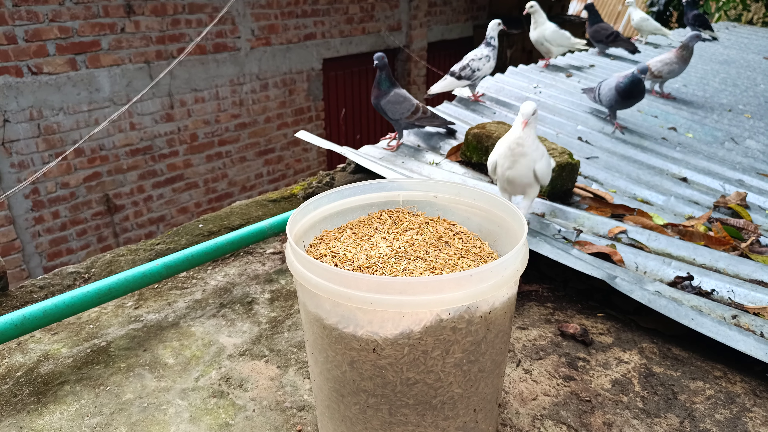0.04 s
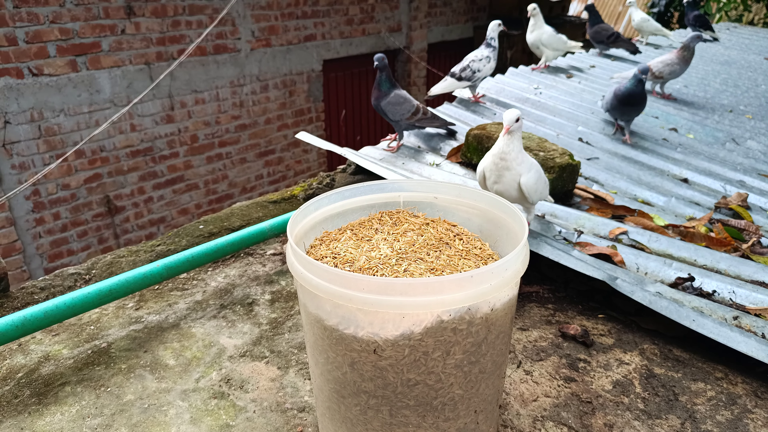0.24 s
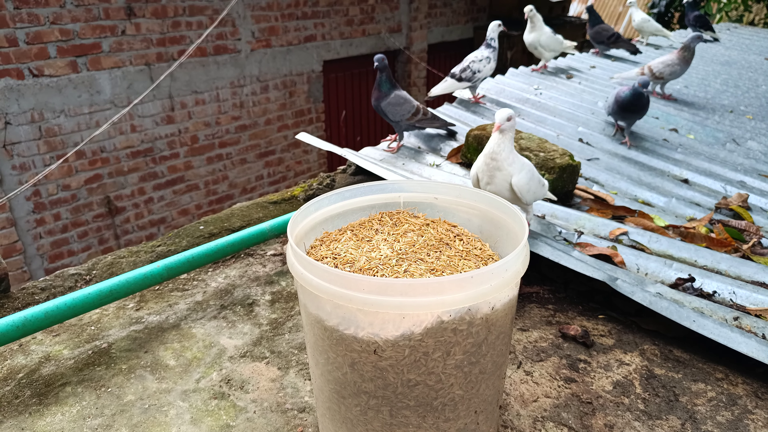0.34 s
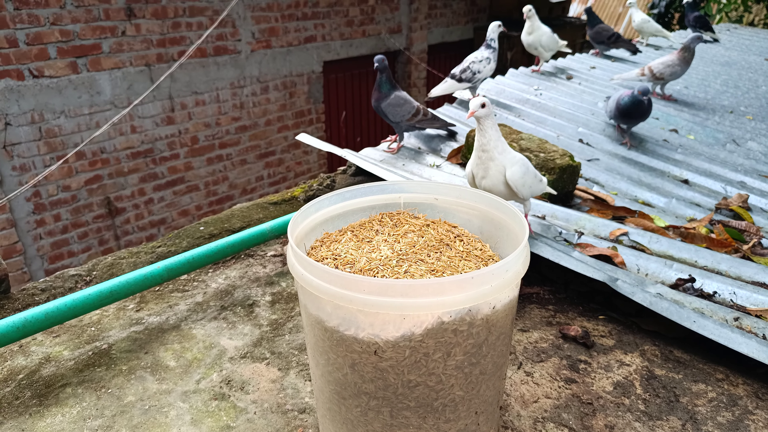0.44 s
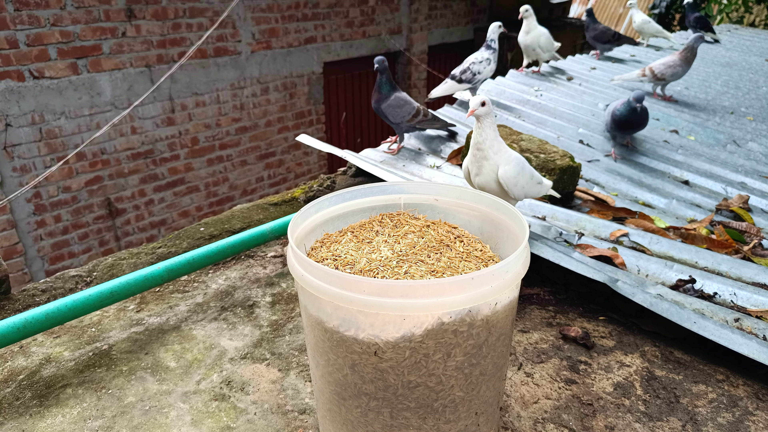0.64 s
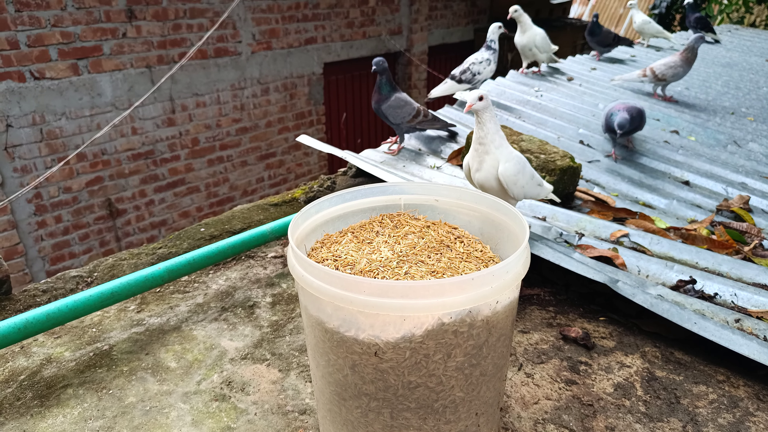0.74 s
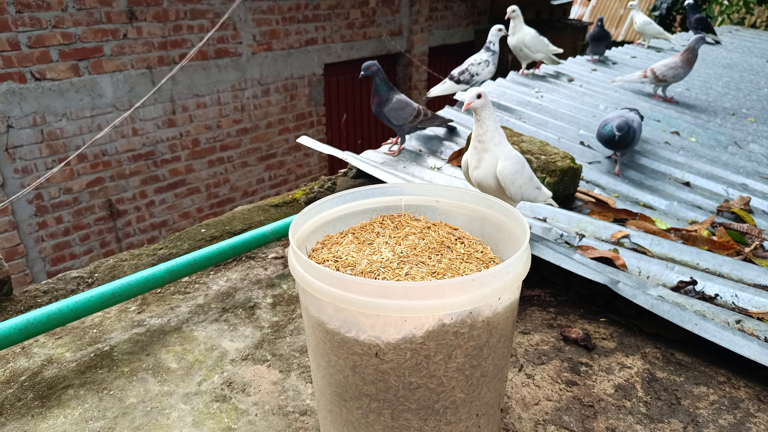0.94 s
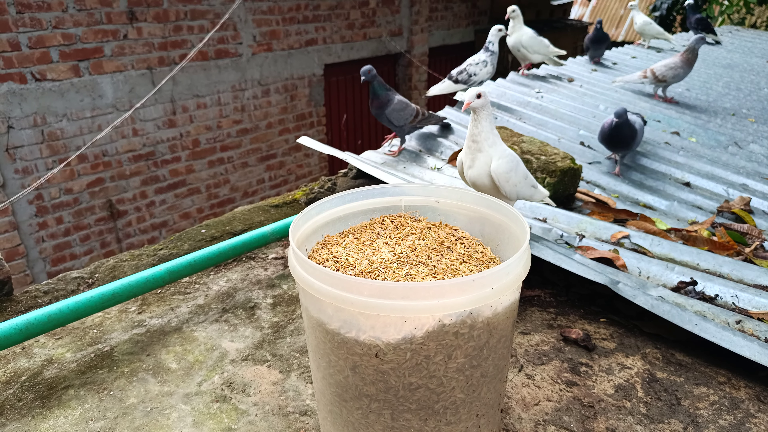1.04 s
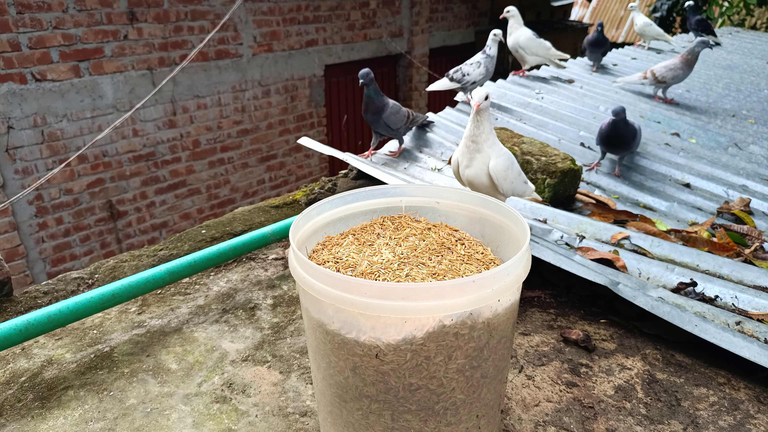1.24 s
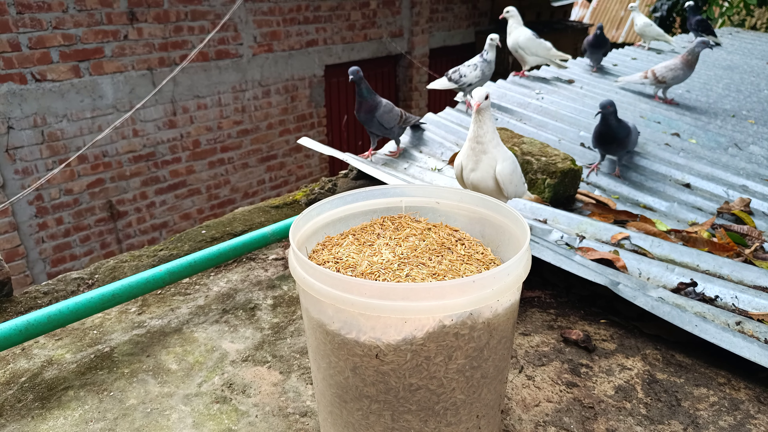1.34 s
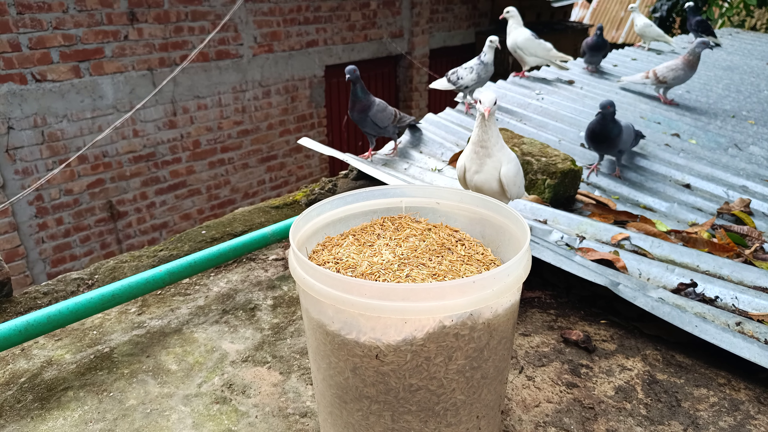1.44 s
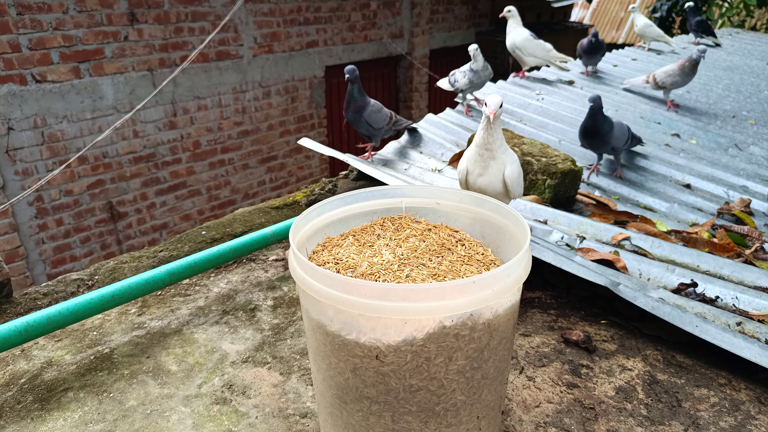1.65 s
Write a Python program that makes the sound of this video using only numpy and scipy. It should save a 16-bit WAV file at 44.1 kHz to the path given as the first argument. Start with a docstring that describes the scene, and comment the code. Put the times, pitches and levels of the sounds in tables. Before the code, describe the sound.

Pigeon feet tap lightly on a metal roof while a small bird chirps far off.

```python
"""Over a quiet outdoor hum a small bird whistles far off, and pigeons patter onto a corrugated metal roof.
Each footfall sends a bending wave through the sheet, treble first and bass last, and the sheet rings
briefly. Claws scuff, the heaviest step lands at 0.3 s, then a lull holds faint ticks and dull knocks.
The feet return at 1 s and 1.3 s; two ticks and a long, soft scuff end the scene."""
import sys
import numpy as np
from scipy import signal
from scipy.fft import rfft, irfft
from scipy.io import wavfile
from scipy.ndimage import uniform_filter1d

SR = 44100
rng = np.random.default_rng(int(sys.argv[2]) if len(sys.argv) > 2 else 0)


def bounce(signal):
    """Save signal as a 16-bit WAV file at the path given by the first command-line argument."""
    frames = np.transpose(np.atleast_2d(signal))
    limited = np.clip(frames, -1, 1)
    pcm = np.round(limited * 32767).astype(np.int16)
    wavfile.write(sys.argv[1], SR, pcm)


N = 74970

# Tone of the outdoor bed. Each row: frequency in Hz, relative level in dB.
AIR_TONE = [(25, -25), (42, -32), (60, -25.5), (90, -5), (130, -4), (210, -8.5), (310, -7), (420, -15),
            (700, -13), (1500, -16), (2500, -17.5), (4000, -19), (6000, -26.5), (7300, -31), (8500, -29.5),
            (11500, -39), (15500, -38.5)]
# Stereo image of the bed. Each row: frequency in Hz, left-right likeness (1 is mono).
AIR_LIKENESS = [(30, 0.97), (80, 1), (300, 0.86), (700, 1), (1500, 0.083), (4000, 0.022), (16000, 0.033)]
# Distant drone. Each row: pitch in Hz, level in dB.
DRONE = [(108, -61.5), (170, -62)]
# The far bird's whistles and, in the last row, a short, high-pitched tick.
# Each row: start and length in seconds, first and last pitch in Hz, level in dB.
GLIDES = [(-.01, 0.057, 5470, 4950, -58), (.155, .10, 3524, 5640, -53.5), (0.384, .10, 3820, 5650, -55.5),
          (0.527, 0.0273, 5300, 4360, -48), (1.384, 0.0134, 4480, 4660, -49.5)]
# Dull knocks. Each row: start in seconds, level in dB, pitch and width in Hz, decay in seconds.
KNOCKS = [(.668, -36, 541, 50, 0.0084), (.680, -45.5, 285.3, 50, 0.038), (.920, -48.5, 1700, 160, 0.017),
          (.112, -35.5, 782, 30.3, 0.017), (1.04, -47, 1026, 70, 0.028), (1.324, -45.5, 219.4, 40, 0.035)]
# Sliding claws. Each row: start and length in seconds, level and treble in dB.
SCUFFS = [(0.211, 0.055, -42, 4.5), (0.237, 0.07, -44.5, -6.5), (0.535, 0.029, -46, 0),
          (.915, 0.081, -51, -25), (1.197, .05, -59, 6), (1.454, 0.18, -52.5, 0)]
# Tone of a scuff. Each row: frequency in Hz, relative level in dB.
SCUFF_TONE = [(200, -29), (900, -10.5), (2500, 2), (5000, -3.5), (6500, -4), (9000, -5), (12000, -7),
              (16000, -1.5)]
# Tone of the metal sheet. Each row: frequency in Hz, gain in dB.
SHEET_TONE = [(60, -39), (200, -14.5), (320, 7), (390, -0.5), (460, 4.5), (560, 5.5), (680, 4), (860, 6),
              (945, -8), (1130, 8.5), (1420, -4), (1700, 6.5), (1900, -2), (2400, 1), (4400, -1),
              (5800, -7), (8500, -10.5), (11500, -13.5), (15500, -11.5)]
# Its clearest modes. Each row: pitch in Hz, relative level in dB, seconds to fade by 60 dB.
SHEET_MODES = [(324.7, -7, .19), (471.4, -0.5, 0.17), (527.4, 1, 0.16), (568, -5, 0.27), (632, 5, 0.16),
               (709, 0, 0.21), (857, 1, .17), (1133, -3.5, 0.13), (1131, -8, 0.13), (1122, -12.5, 0.22),
               (1800, -10, 0.18), (2215, 7, 0.15), (2350, 5.5, 0.075), (3330, -20, 0.16), (4080, 11, 0.13)]
# Its dense ring. Each row: band centre in Hz, seconds to fade by 60 dB.
RING_T60 = [(200, .18), (600, 0.2), (1500, 0.18), (4000, 0.18), (8000, 0.17), (16000, 0.077)]
# Stereo image of the roof. Each row: frequency in Hz, left-right likeness.
ROOF_LIKENESS = [(60, 0.57), (300, 1), (650, 0.5), (1400, 0.64), (3000, 0.097), (16000, 0.041)]
# Light claw ticks. Each row: start in seconds, relative level and treble in dB.
TICKS = [(0.156, -24.5, 2), (0.308, -21.5, -4), (0.633, -31, 4), (1.191, -31, 12.5), (1.427, -21.5, 8)]
# Full steps. Each row: start in seconds, relative level, bass and treble in dB,
# the bending wave's travel time at 1 kHz and the contact length in seconds.
STEPS = [(0.0985, -8.5, -38, 5.5, 0.0069, 0.0024), (.103, -19, -13, 3, 0.0036, 0.0074),
         (0.111, -17, 4, 3.5, 0.0052, 0.011), (0.122, -11, -12, 2.5, 0.00398, 0.0085),
         (0.316, -2, -3, 2, .013, .010), (0.321, 3, -4, -30, 0.0048, 0.01),
         (0.992, -24, -18, 9, 0.0099, 0.0064), (1.006, -14.5, 4, 8, .006, 0.0082),
         (1.301, -12, -14, 2.5, .012, 0.0086), (1.3086, -16.5, 9.5, -8, 0.00295, 0.01),
         (1.324, -12.5, -14.5, -10, 0.0053, 0.0094), (1.344, -17.5, 9.5, 8.5, 0.0051, .013)]
# Colour of the microphone ports. Each row: frequency in Hz, left minus right in dB.
PORT_BALANCE = [(60, -2.5), (140, 2), (250, -1.5), (600, 0), (1700, -0.5), (2700, -4.5), (4300, -9.5),
                (6100, -2), (7300, 4.5), (8500, 18), (10500, 4.5), (12000, 1), (14000, -4.5), (16000, -2)]

AIR_DB, AIR_PATCH_DB = -49.5, 1.35
AIR_LAG_S = 0.000306  # the bed comes from the right and reaches the left microphone later
GLIDE_BEND, GLIDE_WAVER, GLIDE_FLUTTER_DB, ECHO_T60 = 1.3, 0.03, 4, 0.28
SCUFF_GRAIN_DB, SCUFF_RISE_SHARE = 3, 0.11
STEP_DB, RING_DB, MODES_DB, YARD_DB, YARD_T60 = -20, -4, -26.5, -32, 0.87
FULL_CONTACT_S = 0.0067  # shorter contacts leave less ringing in the sheet
THUD_HZ, THUD_S, THUD_DB = 537, 0.0023, -4.5  # the panel gives way underfoot with a hollow thud
PUSH_DB, PUSH_S = 5.5, 0.00005  # the sharp push of the foot that heads each blow
FASTEST_HZ = 4480  # above this all waves arrive together
BASS_HZ, TREBLE_HZ, TOP_HZ = 940, 5600, 15900


def amp(db):
    """Decibels to gain."""
    return 10 ** (np.asarray(db) / 20)


def unit(x):
    """Scales to rms 1."""
    return x / np.sqrt(np.mean(x ** 2) + 1e-20)


def read(points, hz):
    """Reads a curve on a log-frequency axis."""
    f, value = np.transpose(points)
    return np.interp(np.log(hz + 1), np.log(f + 1), value)


def add(mix, s, sound):
    """Mixes a sound in at s seconds."""
    at = round(s * SR)
    sound = sound[..., max(-at, 0):]
    part = mix[:, max(at, 0):][:, :sound.shape[-1]]
    part += sound[..., :part.shape[1]]


def bins(size):
    """Frequencies of a spectrum in Hz."""
    return np.fft.rfftfreq(size, 1 / SR)


def noise_pair(size, likeness):
    """Stereo white noise whose width follows a likeness curve."""
    a, b = rfft(rng.standard_normal((2, size)))
    alike = np.clip(read(likeness, bins(size)), -1, 1)
    mid, side = a * np.sqrt((1 + alike) / 2), b * np.sqrt((1 - alike) / 2)
    return irfft(np.array([mid + side, mid - side]), size)


def wander(size, rate_hz):
    """Smooth random motion of about rms 1."""
    spectrum = rfft(rng.standard_normal(N)) / (1 + (bins(N) / rate_hz) ** 4)
    return unit(irfft(spectrum, N))[:size]


def shelves(hz, bass_db, treble_db):
    """Bass and treble shelf EQ for one contact, in dB."""
    return bass_db / (1 + (hz / BASS_HZ) ** 2) + treble_db / (1 + (TREBLE_HZ / (hz + 1)) ** 4)


def outdoors():
    """The bed: a quiet, gently patchy wash of air with a wavering low drone."""
    lag = np.exp(-2j * np.pi * np.outer([AIR_LAG_S, 0], bins(N)))
    wash = irfft(rfft(noise_pair(N, AIR_LIKENESS)) * lag * amp(read(AIR_TONE, bins(N))), N)
    frames = signal.stft(wash, nperseg=512)[2]
    patches = uniform_filter1d(rng.standard_normal(frames.shape[1:]), size=9, axis=0)  # across frequency
    patches = unit(uniform_filter1d(patches, size=12, axis=1))  # across time
    wash = signal.istft(frames * amp(AIR_PATCH_DB * patches), nperseg=512)[1][:, :N]
    out = unit(wash) * amp(AIR_DB)
    for hz, db in DRONE:
        pitch = hz + 4 * wander(N, rate_hz=11.8)
        out += amp(db) * np.sin(2 * np.pi * np.cumsum(pitch) / SR)
    return out


def far_bird_and_tick():
    """Thin gliding whistles and one short, high-pitched tick, blurred by echoes from the walls."""
    out, t = np.zeros((2, N)), np.arange(SR // 2) / SR
    for s, length, first_hz, last_hz, db in GLIDES:
        progress = np.arange(0, 1, 1 / (length * SR))
        glide = last_hz + (first_hz - last_hz) * (1 - progress) ** GLIDE_BEND
        pitch = glide * (1 + GLIDE_WAVER * wander(len(progress), rate_hz=480))
        level = amp(db + GLIDE_FLUTTER_DB * wander(len(progress), rate_hz=70))
        arch = np.sqrt(abs(np.sin(np.pi * progress)))
        add(out, s, level * arch * np.sin(2 * np.pi * np.cumsum(pitch) / SR))
    echo = rng.standard_normal((2, len(t))) * amp(-60 * t / ECHO_T60)
    return out + signal.fftconvolve(out, echo / np.linalg.norm(echo[0]), axes=1)[:, :N]


def knocks(rise_s=0.0031):
    """Birds farther up the roof: each soft blow wakes one narrow group of modes."""
    out, t = np.zeros((2, N)), np.arange(SR // 4) / SR
    for s, db, hz, width, decay_s in KNOCKS:
        pitch = hz + width / 2 * wander(len(t), rate_hz=width)
        envelope = np.minimum(t / rise_s, 1) * np.exp(-np.maximum(t - rise_s, 0) / decay_s)
        add(out, s, amp(db) * envelope * np.sin(2 * np.pi * np.cumsum(pitch) / SR))
    return out


def scuffs():
    """Claws slide over the metal with a grainy hiss."""
    out, hz = np.zeros((2, N)), bins(N)
    for s, length, db, treble_db in SCUFFS:
        progress = np.arange(0, 1, 1 / (length * SR))
        grains = noise_pair(N, ROOF_LIKENESS) * amp(SCUFF_GRAIN_DB * wander(N, rate_hz=810))
        tone = amp(read(SCUFF_TONE, hz) + shelves(hz, 0, treble_db))
        hiss = unit(irfft(rfft(grains) * tone, N))
        envelope = np.minimum(progress / SCUFF_RISE_SHARE, 1) * (1 - progress)
        add(out, s, amp(db) * hiss[:, :len(progress)] * envelope)
    return out


def sheet_ring(t):
    """The tail of a blow: faint yard reverb under the sheet's dense ring and its clear modes."""
    tail = noise_pair(len(t), ROOF_LIKENESS) * amp(YARD_DB - 60 * t / YARD_T60)
    dense = rfft(noise_pair(len(t), ROOF_LIKENESS))
    centres, t60s = np.transpose(RING_T60)
    for share, t60 in zip(np.eye(len(centres)), t60s):
        band = irfft(dense * read(np.c_[centres, share], bins(len(t))))
        tail += band * amp(RING_DB - 60 * t / t60)
    for hz, db, t60 in SHEET_MODES:
        spread = 1 - read(ROOF_LIKENESS, hz)
        turn = rng.random() + spread * rng.uniform(-0.32, 0.39, (2, 1))  # starting phase, left and right
        tail += amp(MODES_DB + db - 60 * t / t60) * np.sin(2 * np.pi * (hz * t + turn))
    return tail


def bending_wave(hz, travel_s):
    """Phase shift through the sheet: travel time falls with the root of frequency, so the bass trails."""
    delay_s = travel_s * np.sqrt(1000) * np.maximum((hz + 1) ** -.5 - FASTEST_HZ ** -.5, 0)
    return np.exp(-2j * np.pi * np.cumsum(delay_s) * hz[1])


def footfall(db, bass_db, treble_db, travel_s, contact_s):
    """One foot strikes: push, contact noise, thud and ring, smeared and coloured by the sheet."""
    size = 2 ** 14
    t, hz = np.arange(size) / SR, bins(2 * size)
    ring = sheet_ring(t) * np.sqrt(contact_s / FULL_CONTACT_S)
    contact = noise_pair(size, ROOF_LIKENESS) * np.exp(-(t / contact_s) ** 2)
    thud = amp(THUD_DB) * np.exp(-t / THUD_S) * np.cos(2 * np.pi * THUD_HZ * t)
    push = amp(PUSH_DB) * np.exp(-t / PUSH_S)
    blow = rfft(push + contact + thud + ring, 2 * size)
    log_gain = np.log(amp(STEP_DB + db + read(SHEET_TONE, hz) + shelves(hz, bass_db, treble_db)))
    mirrored = np.r_[log_gain, log_gain[-2:0:-1]]
    tone = np.exp(np.conj(signal.hilbert(mirrored))[:len(hz)])  # minimum phase keeps the attack crisp
    return irfft(blow * bending_wave(hz, travel_s) * tone)[:, :size]


def pigeon_feet():
    """Full steps and light claw ticks on the same sheet, a metre or two away."""
    out = np.zeros((2, N))
    for s, *blow in STEPS:
        add(out, s, footfall(*blow))
    for s, db, treble_db in TICKS:
        add(out, s, footfall(db, bass_db=-14, treble_db=treble_db, travel_s=0.003, contact_s=0.0084))
    return out


def scene():
    """The roof in front, the bird and the hum behind."""
    return pigeon_feet() + knocks() + scuffs() + far_bird_and_tick() + outdoors()


def record(dry):
    """Each microphone port adds its own colour; a steep low-pass trims the very top."""
    ports = amp(np.outer([.5, -.5], read(PORT_BALANCE, bins(2 * N))))
    coloured = irfft(rfft(dry, 2 * N) * ports)[:, :N]
    lowpass = signal.firwin(511, TOP_HZ, window=("kaiser", 9), fs=SR)
    return signal.oaconvolve(coloured, lowpass[None], "same")


dry = scene()
out = record(dry)
bounce(out)
```